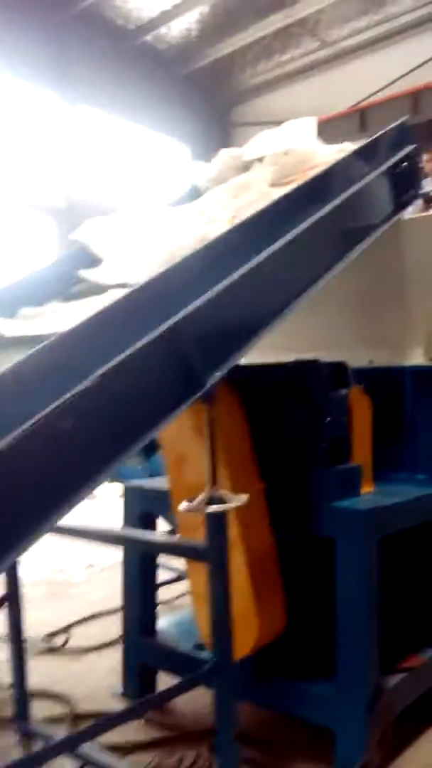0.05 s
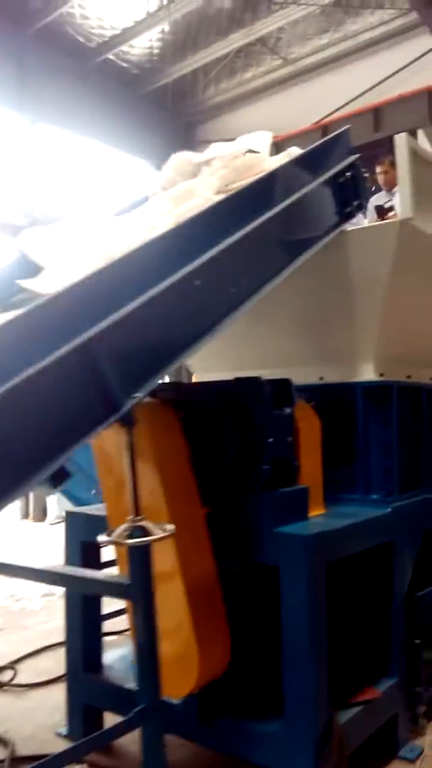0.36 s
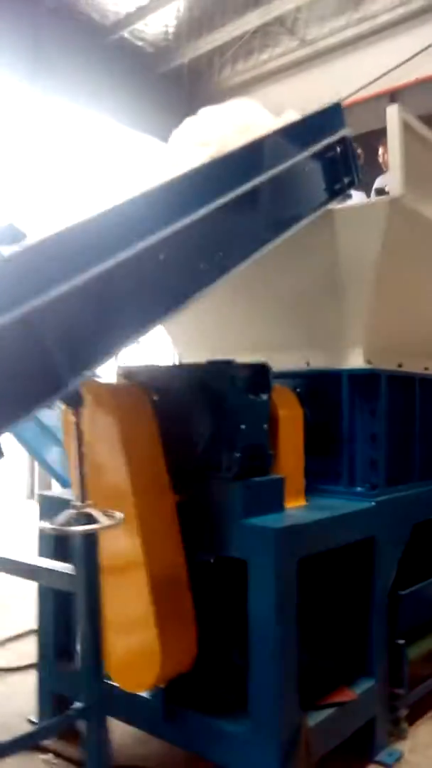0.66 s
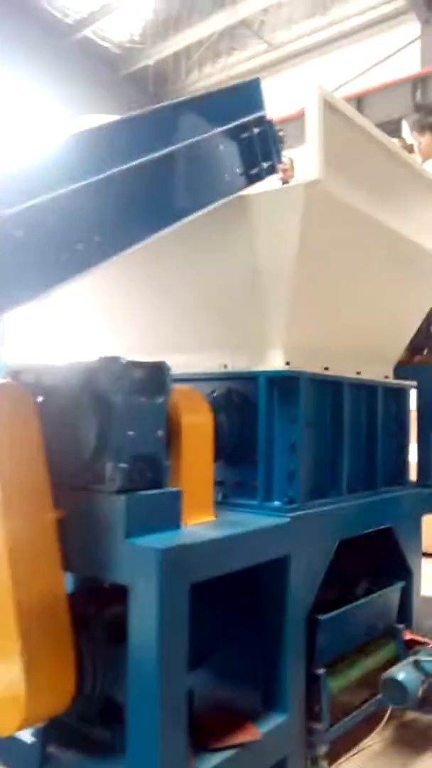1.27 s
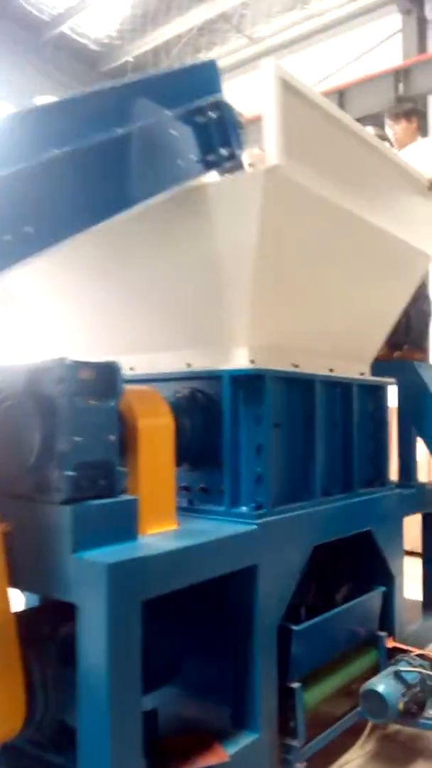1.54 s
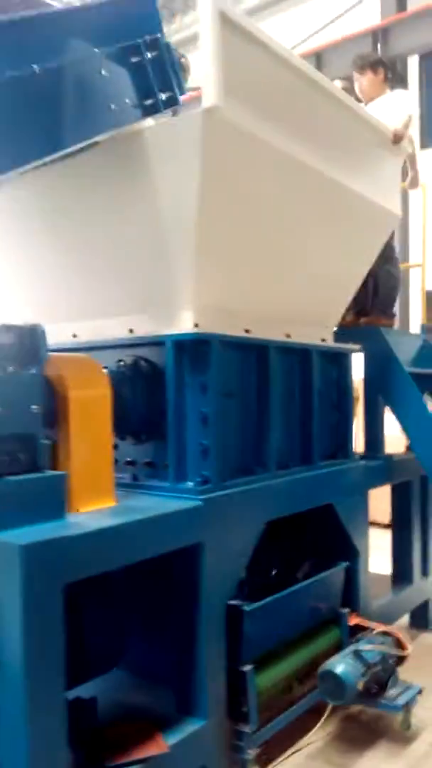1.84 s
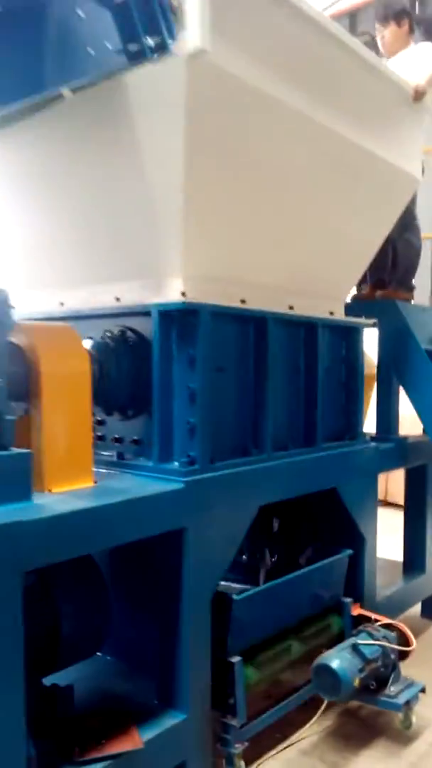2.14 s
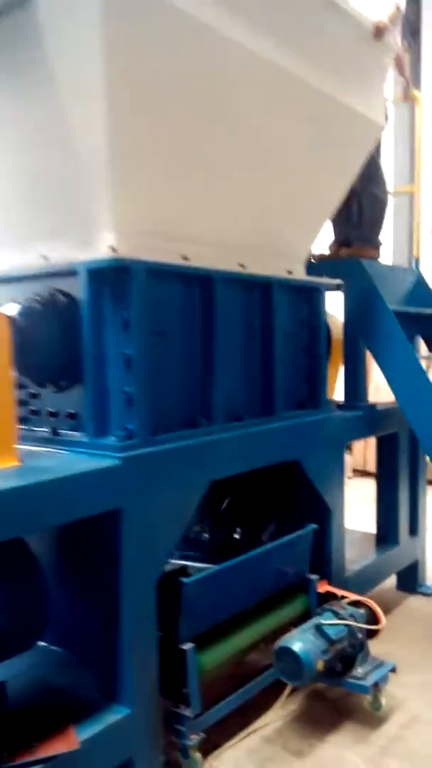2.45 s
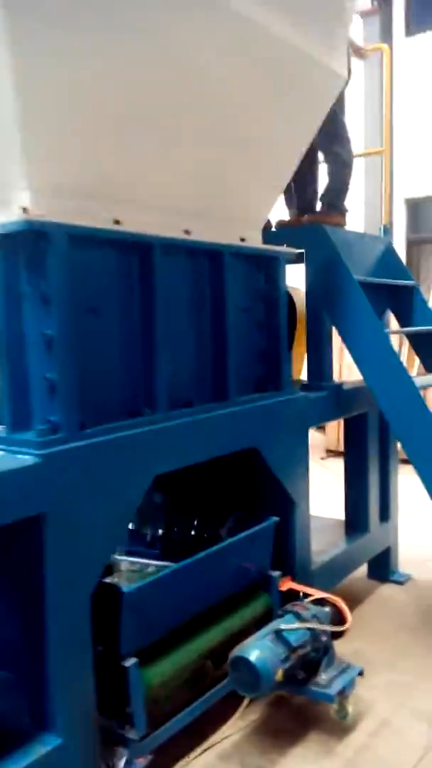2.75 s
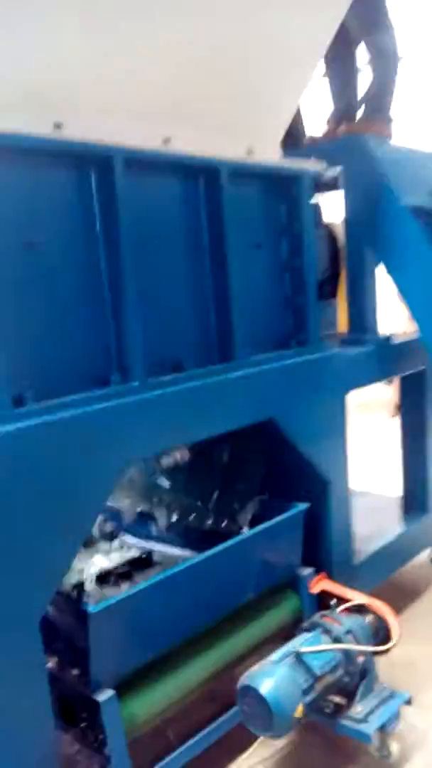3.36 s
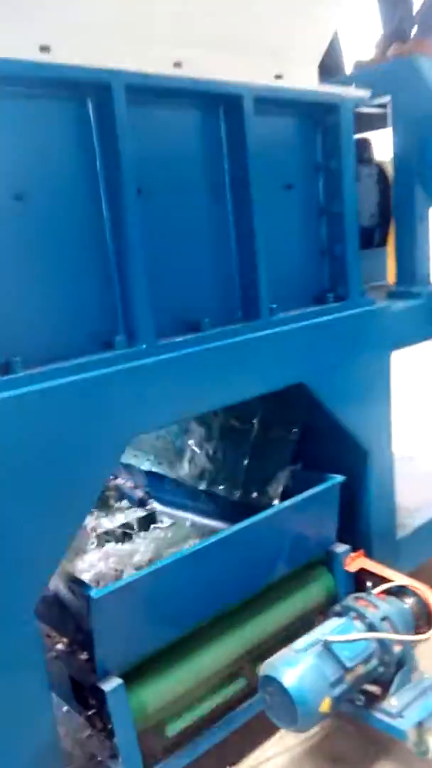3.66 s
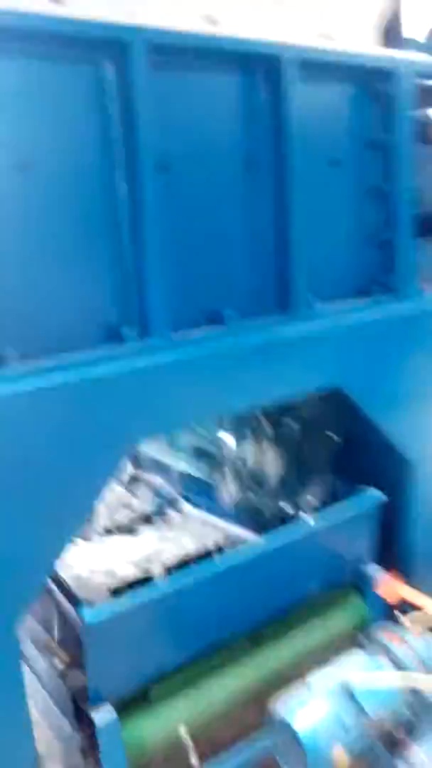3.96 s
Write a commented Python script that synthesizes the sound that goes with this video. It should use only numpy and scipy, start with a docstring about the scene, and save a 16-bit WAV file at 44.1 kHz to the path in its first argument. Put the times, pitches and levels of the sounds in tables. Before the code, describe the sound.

An industrial shredder drones loudly and steadily, with whining gears and churning plastic scrap.

```python
"""Walking along an industrial shredder

A shredder runs steadily in a large workshop while the listener walks from its drive to its cutter box.
Motors and shafts hum in the steel frame, gears whine, and the cutters churn and rustle plastic scrap.
Now and then a piece breaks with a knock, a thud, a squeak or a thin snap."""
import sys
import numpy as np
from scipy import signal
from scipy.fft import rfft, irfft
from scipy.io import wavfile

SR = 44100
rng = np.random.default_rng(int(sys.argv[2]) if len(sys.argv) > 2 else 0)


def file_out(sig):
    """Save sig as 16-bit WAV at sys.argv[1]."""
    # one column per channel
    cols = np.atleast_2d(sig).T
    # limit, then scale
    lim = np.clip(cols, -1, 1)
    pcm = np.round(lim * 32767).astype(np.int16)
    wavfile.write(sys.argv[1], SR, pcm)


N = 176400


def from_db(db):
    """Turn decibels into a number to multiply a sound by."""
    return 10 ** (np.asarray(db) / 20)


def unit_power(x):
    """Scale a signal so that its average power is 1."""
    return x / np.sqrt(np.mean(np.abs(x) ** 2) + 1e-20)


def curve(rows):
    """Join (time, value) points with straight lines, giving a value for every sample."""
    return np.interp(np.arange(N) / SR, *np.transpose(rows))


def drift(hz):
    """A smooth random wobble of about size 1; a higher hz makes it quicker."""
    step, warm_up = 40, 2000   # one point every 40 samples; the first 2000 points are skipped
    memory = np.exp(-2 * np.pi * hz * step / SR)
    noise = rng.standard_normal(N // step + warm_up + 2)
    slow = signal.lfilter([1], [1, -2 * memory, memory ** 2], noise)[warm_up:]
    return np.interp(np.arange(N) / step, np.arange(len(slow)), unit_power(slow))


def coloured(x, colour):
    """Make some frequencies stronger than others, as a ringing object does; the result has power 1."""
    hz, db = np.transpose(colour)
    all_hz = np.maximum(np.fft.rfftfreq(N, 1 / SR), 1)
    gain = from_db(np.interp(np.log(all_hz), np.log(hz), db))
    return unit_power(irfft(rfft(x) * gain, N))


def workshop_echo(x, fade_s=1, echo_db=-5.5):
    """The walls add a wash of echoes that fades by 60 dB in fade_s."""
    t = np.arange(SR) / SR
    tail = rng.standard_normal(SR) * from_db(-60 * t / fade_s)
    return x + from_db(echo_db) * signal.fftconvolve(x, tail / np.linalg.norm(tail))[:N]


def tiny_hits(per_s, share, spread_db=2.5):
    """Many echoing clicks of uneven size give their share of the power; a smooth rush gives the rest."""
    sizes = from_db(spread_db * np.minimum(rng.exponential(1, N), 5))
    signs = rng.choice([-1, 1], N)
    clicks = workshop_echo(sizes * signs * (rng.random(N) < per_s / SR))
    return np.sqrt(share) * unit_power(clicks) + np.sqrt(1 - share) * rng.standard_normal(N)


def tone(clock, hz, unsteady, wobble_hz=2.2):
    """The note of a turning part, from steady (unsteady=0) to fully wavering (unsteady=1)."""
    wobble = unit_power(drift(wobble_hz) + 1j * drift(wobble_hz))   # moves both strength and phase
    strength = np.sqrt(1 - unsteady ** 2) + unsteady * wobble
    spin = np.exp(2j * np.pi * (hz * clock + rng.random()))
    return unit_power(np.real(strength * spin))


# How the frame's sound rises and falls along the walk: (time [s], relative level [dB])
FRAME_LOUDNESS = [(0, -37.5), (.6, -38.5), (1.4, -36), (1.85, -37.5), (2.3, -35), (2.7, -32.5), (2.95, -34),
                  (3.5, -32), (4, -33)]
# The deep colour of the steel frame: (frequency [Hz], relative level [dB])
FRAME_COLOUR = [(20, -43.5), (30, -36.5), (39, -17.5), (60, -16.5), (80, -6.5), (112, -10), (145, -2.5),
                (168, -2.5), (215, 1), (280, -3), (330, -5.5), (480, -9), (700, -31), (1500, -65.5)]
# Quieter motor and belt hums: (pitch [Hz], average level [dB], unsteadiness [0-1])
QUIET_HUMS = [(40.2, -72.5, .3), (101.1, -43.5, .5), (173.1, -43.5, 0.6), (183, -43.5, 0.71),
              (224.6, -42, 0.9), (260.1, -38, 0.56), (289, -44, .8)]
def frame(clock, rumble_gain_db=5):
    """The steel frame rumbles and carries the quieter hums of motors and belts."""
    level_db = curve(FRAME_LOUDNESS)
    rumble = from_db(level_db + rumble_gain_db) * coloured(rng.standard_normal(N), FRAME_COLOUR)
    hum = sum(from_db(db) * tone(clock, hz, unsteady) for hz, db, unsteady in QUIET_HUMS)
    swell = from_db(.6 * (level_db - level_db.mean()))   # the hums partly follow the rumble
    return rumble + swell * hum


# The deep drone of the drive along the walk: (time [s], level [dB])
DRONE_LOUDNESS = [(0, -54.5), (.8, -54), (1.15, -45), (1.7, -49), (2.15, -42.5), (2.4, -43), (2.65, -38),
                  (3.3, -37.5), (3.7, -46.5), (4, -42)]
# The three main hums along the walk: (time [s], low hum [dB], middle hum [dB], high hum [dB])
SHAFT_LOUDNESS = [(0, -40.5, -43, -38), (0.25, -36.5, -40, -34), (0.5, -35, -26.5, -32.5),
                  (0.75, -33, -32.5, -31), (1, -26.5, -29.5, -37), (1.2, -32, -33, -33),
                  (1.4, -31.5, -35.0, -26.5), (1.6, -23.5, -38, -31), (1.85, -37.5, -30.5, -30.5),
                  (2.05, -31, -34.5, -27), (2.25, -28, -29, -32.0), (2.5, -28.5, -29.5, -27),
                  (2.8, -38, -37, -36.5), (3.05, -34, -24.5, -21), (3.3, -31, -40.5, -34.5),
                  (3.55, -30, -32.5, -20.5), (3.75, -30, -28, -32), (4, -25, -25.5, -18.5)]
# The same three hums: (pitch [Hz], gain added to the level above [dB], unsteadiness [0-1])
SHAFT_HUMS = [(130.9, -5.5, .3), (146.5, -4.5, 0.56), (212.7, -5, .5)]
def shafts(clock):
    """The drive drones, and three shaft hums each swell and fade as the listener moves."""
    drone = from_db(curve(DRONE_LOUDNESS)) * tone(clock, hz=81.1, unsteady=.75)
    times, *levels = np.transpose(SHAFT_LOUDNESS)
    hums = np.zeros(N)
    for level_db, (hz, gain_db, unsteady) in zip(levels, SHAFT_HUMS):
        hums += from_db(curve(np.c_[times, level_db]) + gain_db) * tone(clock, hz, unsteady)
    return drone + hums


# The main note of the gear teeth along the walk: (time [s], relative level [dB])
TEETH_LOUDNESS = [(0, -37), (0.2, -46.5), (0.35, -39.5), (0.55, -55), (0.8, -43), (1.1, -46), (1.3, -38.5),
                  (1.75, -42), (2.05, -30.5), (2.17, -40.5), (2.37, -34), (2.65, -36.5), (2.95, -37.0),
                  (3.1, -38), (3.3, -35), (3.55, -33.5), (3.72, -41), (3.9, -29.5)]
# Fainter gear notes: (pitch [Hz], average level [dB], unsteadiness [0-1], wobble speed [Hz])
FAINT_WHINES = [(698.5, -47.5, 0.86, 10), (846, -51, .6, 7.8), (1149, -54, 0, 4.6), (1374, -50, .95, 18),
                (1394, -47, 0.8, 7.3), (1430, -51, 0.7, 9)]
# The high whistle of the drive along the walk: (time [s], level [dB])
WHISTLE_LOUDNESS = [(0, -53), (0.3, -47), (0.6, -49.5), (0.9, -50), (1.1, -51.5), (1.45, -47), (1.65, -51),
                    (1.85, -47), (2.2, -48), (2.45, -45), (2.75, -53), (2.98, -40), (3.25, -47), (3.5, -44),
                    (3.7, -45.5), (3.92, -40.5)]
def gears(clock, teeth_gain_db=-1):
    """Gear teeth meet and sing one strong note, with fainter notes around it and a whistle above."""
    teeth_db = curve(TEETH_LOUDNESS) + teeth_gain_db
    teeth = from_db(teeth_db) * tone(clock, hz=1385.6, unsteady=.14, wobble_hz=6)
    whine = sum(from_db(db) * tone(clock, hz, unsteady, wobble_hz)
                for hz, db, unsteady, wobble_hz in FAINT_WHINES)
    whistle = from_db(curve(WHISTLE_LOUDNESS)) * tone(clock, hz=2447, unsteady=.61, wobble_hz=20)
    box_db = curve(CUTTER_LOUDNESS)
    swell = from_db(.47 * (box_db - box_db.mean()))   # the faint notes partly follow the cutters below
    return teeth + swell * whine + whistle


# The rattling blades along the walk: (time [s], relative level [dB])
CUTTER_LOUDNESS = [(0, -41), (.9, -40), (1.2, -39), (1.5, -38.5), (1.9, -39.5), (2.2, -37), (2.6, -34.5),
                   (2.9, -37), (3.5, -34), (4, -37)]
# The colour of the cutter box: (frequency [Hz], relative level [dB])
CUTTER_COLOUR = [(250, -38), (510, 3.5), (620, 1.5), (780, -0.5), (1050, 0.5), (1250, 3), (1400, 6),
                 (1700, 3), (2100, -0.5), (2350, -6.5), (2700, -15.5), (4000, -30.5), (8000, -67.5)]
# The rustling plastic along the walk: (time [s], relative level [dB])
SCRAP_LOUDNESS = [(0, -45), (.95, -46), (1.2, -44.5), (2.1, -46.5), (2.65, -41), (3.0, -42.5), (3.55, -40),
                  (4, -41.5)]
# The bright colour of the plastic: (frequency [Hz], relative level [dB])
SCRAP_COLOUR = [(1500, -31.5), (2400, 1), (2820, 1), (3100, -0.5), (3700, 1), (4070, 4.5), (4500, -3),
                (5200, -4.5), (6100, -2.5), (6800, -3.5), (7300, -7.5), (7800, -16), (8500, -26.5),
                (9200, -46.5)]
def cutters(clock, turns_per_s=3.1, rattle_gain_db=4.5, rustle_gain_db=.26):
    """The blades rattle in their box and the scrap rustles, both under one uneven load."""
    turn_db = .4 * np.sin(2 * np.pi * turns_per_s * clock)   # the load swells with each turn
    load_db = turn_db + .6 * drift(hz=42)   # churning adds a quick flutter
    rattle = coloured(tiny_hits(per_s=500, share=.29), CUTTER_COLOUR)
    rustle = coloured(tiny_hits(per_s=900, share=.22), SCRAP_COLOUR)
    rattle_db = curve(CUTTER_LOUDNESS) + rattle_gain_db + load_db
    rustle_db = curve(SCRAP_LOUDNESS) + rustle_gain_db + .5 * load_db
    return from_db(rattle_db) * rattle + from_db(rustle_db) * rustle


# Pieces breaking: (time [s], peak before echo [dB], pitch [Hz], band width [Hz], time to fade 60 dB [s])
BREAKING_PIECES = [(.352, -39, 5870, 450, .16), (1.033, -18, 1250, 1680, .045), (2.571, -18, 202, 272, .25),
                   (3.445, -30, 7250, 700, 0.037), (3.549, -42, 6300, 3000, .05),
                   (3.733, -30, 1800, 1290, .035), (3.774, -33, 6300, 1200, .05)]
def breaking_pieces():
    """Each breaking piece gives a short, dying burst of noise around its own pitch."""
    bursts = np.zeros(N)
    for start_s, peak_db, hz, width_hz, fade_s in BREAKING_PIECES:
        age = np.arange(N) / SR - start_s
        fade = (age >= 0) * from_db(-60 * np.clip(age / fade_s, 0, 4))
        band = signal.butter(4, [hz - width_hz / 2, hz + width_hz / 2], "band", fs=SR, output="sos")
        burst = signal.sosfilt(band, rng.standard_normal(N) * fade)
        bursts += from_db(peak_db) * burst / np.abs(burst).max()
    return workshop_echo(bursts)


def scene():
    """Add everything into one channel; all turning parts share one slightly wandering speed."""
    speed = 1 + .0012 * drift(hz=2.63)
    clock = np.cumsum(speed) / SR   # the machine's own time, in seconds
    return (frame(clock) + shafts(clock) + gears(clock) + cutters(clock) + breaking_pieces())[None]


def record(dry, cutoff_hz=8900):
    """Cut away the highest treble steeply."""
    return signal.sosfilt(signal.ellip(12, .1, 90, cutoff_hz, fs=SR, output="sos"), dry)


dry = scene()
out = record(dry)
file_out(out)
```